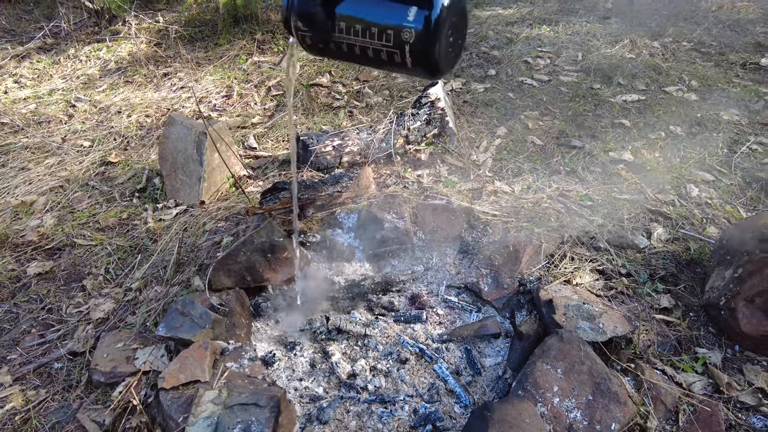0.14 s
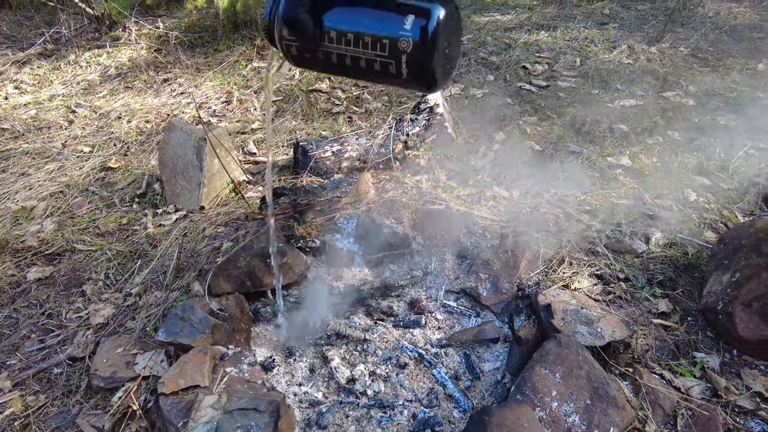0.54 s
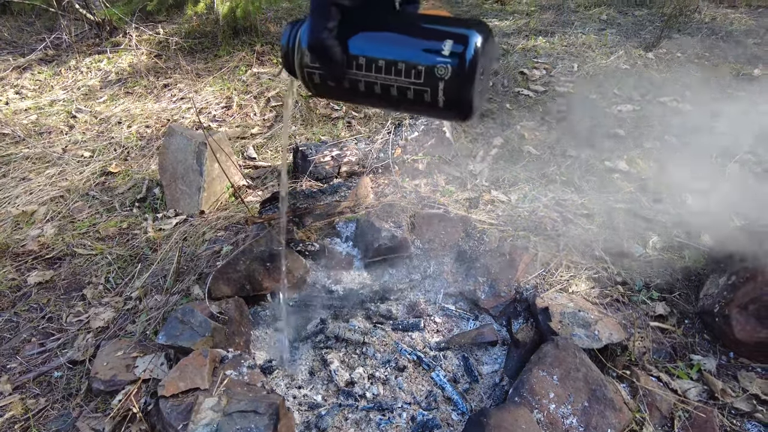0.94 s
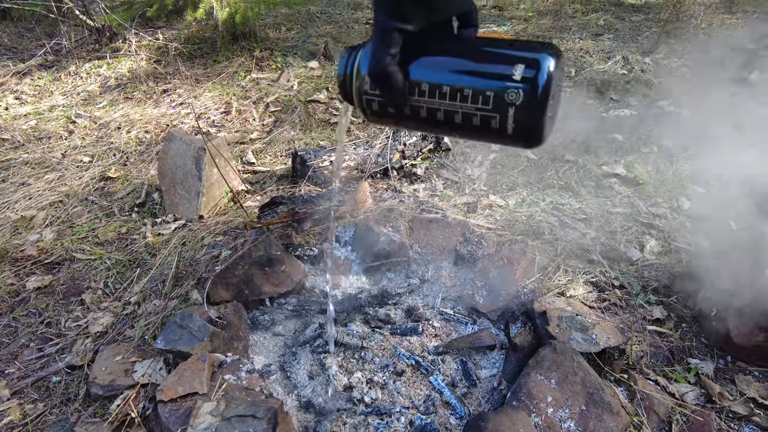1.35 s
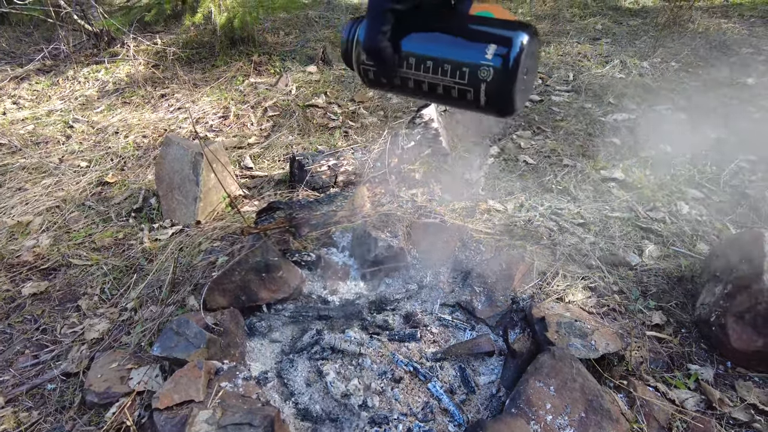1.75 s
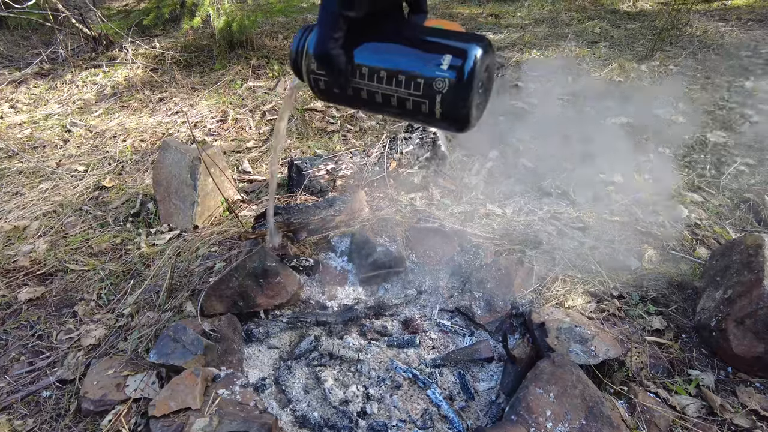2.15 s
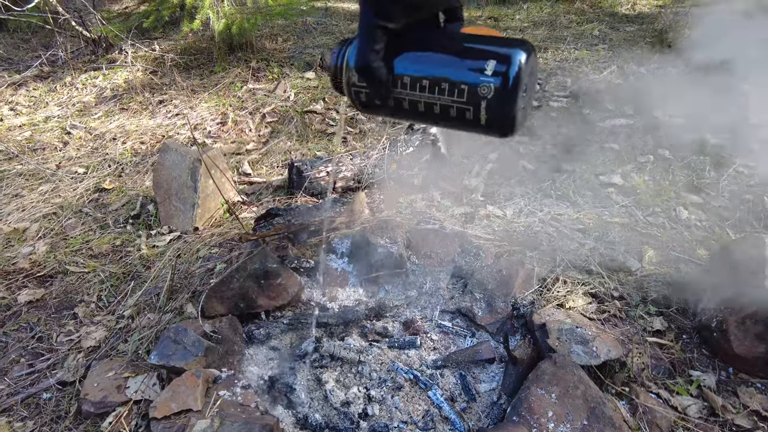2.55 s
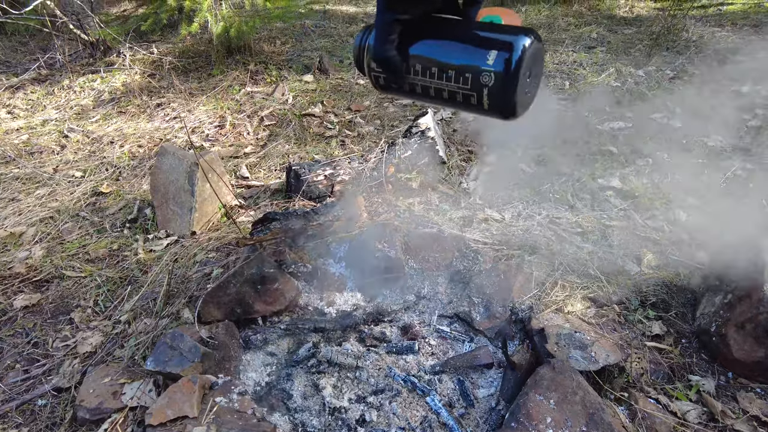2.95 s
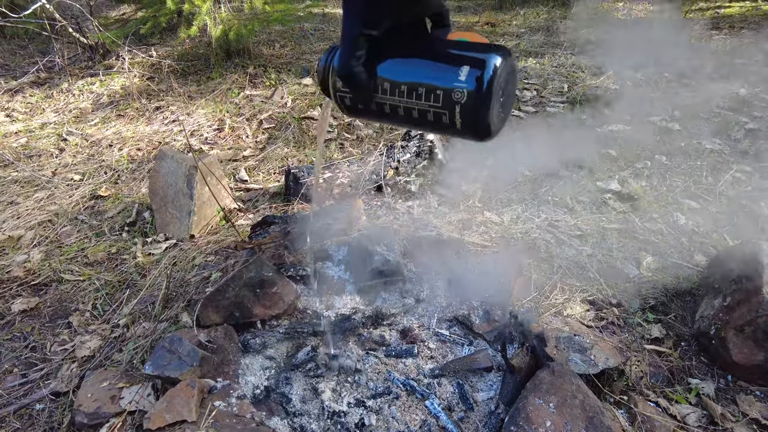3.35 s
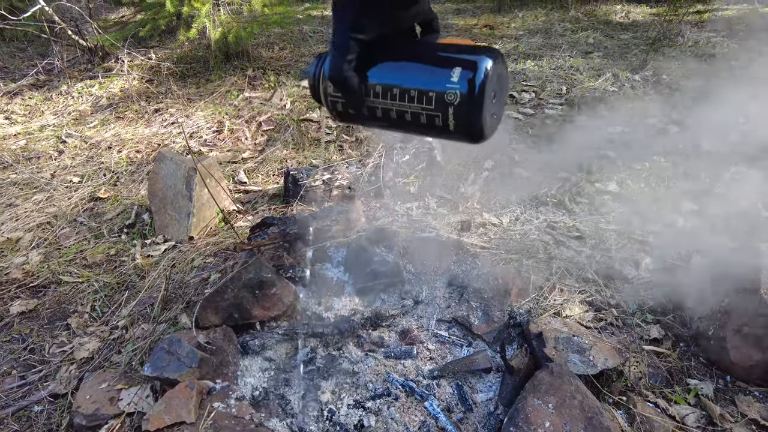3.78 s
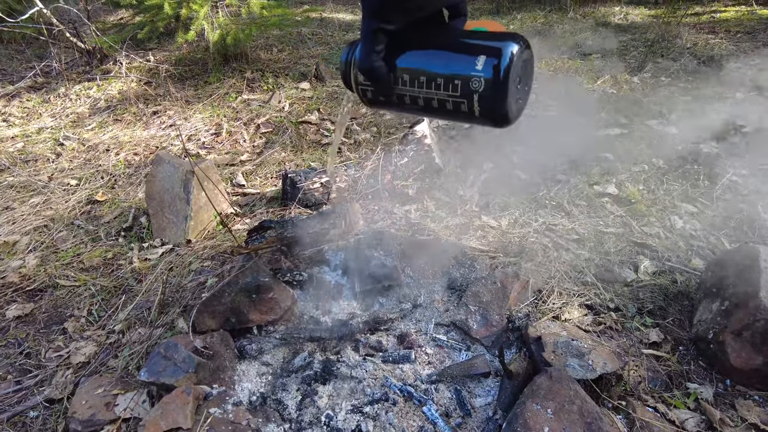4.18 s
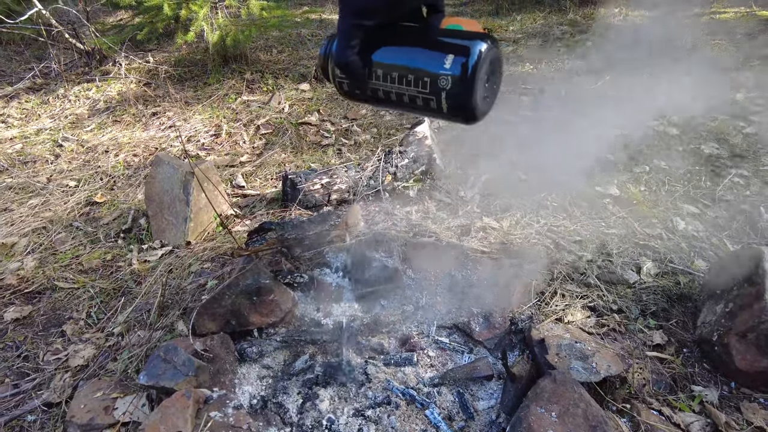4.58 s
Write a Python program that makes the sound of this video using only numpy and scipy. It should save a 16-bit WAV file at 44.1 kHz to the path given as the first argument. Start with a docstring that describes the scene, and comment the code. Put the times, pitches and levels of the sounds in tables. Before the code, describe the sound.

Water is already pouring onto a smouldering campfire at 0 s: a dense, low, muffled patter into soft ash, with wet spray and tiny bubbling rings. The coals answer with fine boiling fizz and bright sputtering steam, slightly left. Small ember cracks come around 0.2 s, with sharper snaps at 0.5 to 0.65 s and another at 1.0 s. From 0.8 s the pour grows patchier, with plops at 0.8, 1.4 and 1.7 s. It thins to a simmer at about 1.9 to 2.3 s, then a splash and quick tss arrive at 2.37 s, and a cluster of cracks near 2.6 s. Heavy slugs land at 2.8 s. After a lull from 3.0 to 3.4 s, a strong gush runs 3.4 to 3.8 s, heaviest around 3.6 s. Spurts follow near 4.0 s, then weak dribbling, and a last splash with a tiny crack at 4.47 s. Close, dry, open-air, with faint bass rumble.

```python
"""At an outdoor campfire, water is poured from a bottle onto the embers, in uneven swells.
Drops thud into soft ash (short low sines) and splatter (noise bursts and tiny ringing bubbles).
The wetted coals boil, hiss with steam and now and then crack: clouds of short sines and shaped noise.
A small stereo microphone stands close by, over a faint outdoor rumble of low-pitched noise."""
import sys
import numpy as np
from scipy import signal
from scipy.fft import rfft, irfft, next_fast_len
from scipy.io import wavfile
from scipy.ndimage import uniform_filter1d

SR = 44100
rng = np.random.default_rng(int(sys.argv[2]) if len(sys.argv) > 2 else 0)


def generate_wav(signal):
    """Clip the signal to [-1, 1] and save it as 16-bit WAV at the path in sys.argv[1]."""
    frames = np.transpose(np.atleast_2d(signal))
    scaled = np.clip(frames, -1, 1) * 32767
    pcm = np.round(scaled).astype(np.int16)
    wavfile.write(sys.argv[1], SR, pcm)


N = 208152  # length in samples

# gushes and trickles from the bottle, levels before each sound's own trim: start t/s, hold/s, release/s,
# thud level/dB, splatter level/dB, sizzle level/dB of the coals they hit
GUSH_TABLE = [(-0.1, 0.3, 0.086, -41.5, -49, -54), (0.242, 0.24, 0.035, -42.5, -50.5, -58),
              (0.45, 0.25, 0.14, -49, -52.5, -55), (0.77, 0.096, 0.18, -44, -53.5, -58.5),
              (0.922, 0.22, 0.11, -52, -56, -54.5), (1.187, 0.066, 0.15, -49.5, -51.5, -55.5),
              (1.37, 0.092, 0.1, -49, -54, -56.5), (1.458, 0.11, 0.066, -53, -56.5, -58),
              (1.588, 0.031, 0.081, -43.5, -51.5, -57), (1.668, .14, 0.098, -43.5, -53.5, -62.5),
              (1.92, 0.37, 0.17, -66.5, -63.5, -69.5), (2.363, 0.019, 0.03, -45, -56, -56.5),
              (2.407, 0.025, 0.057, -48, -50, -55), (2.494, .1, 0.061, -55.5, -71.5, -59),
              (2.635, 0.098, 0.041, -43.5, -53, -59), (2.746, 0.11, 0.06, -43.5, -53.5, -61.5),
              (2.967, 0.057, .018, -59.5, -61.5, -72), (3.05, .17, .03, -85, -68, -75),
              (3.405, 0.031, 0.011, -41.5, -58.5, -57.5), (3.482, 0.29, 0.029, -39, -54, -55.5),
              (3.783, 0.029, .04, -60, -52, -57), (3.993, 0.043, 0.077, -45, -53.5, -59),
              (4.076, 0.089, 0.074, -44.5, -60.5, -62), (4.185, 0.39, .03, -56, -64.5, -62.5),
              (4.454, 0.059, 0.03, -39.5, -53, -56.5), (4.53, 0.14, .12, -50, -59, -57.5)]
# colour of water splattering: f/Hz, relative level/dB
SPLATTER_SPECTRUM = [(150, -18), (400, -0.5), (700, 0.5), (1200, -1), (1500, -2.5), (2300, -4.5),
                     (3100, -1), (4000, -6.5), (6000, -9), (12000, -26)]
# colour of hissing steam: f/Hz, relative level/dB
STEAM_SPECTRUM = [(600, -11), (1500, -3), (3000, 0), (6000, -5.5), (7500, -2.5), (9500, -0.5),
                  (11200, -2.5), (12600, -7.5), (15800, -6)]


def amp(db):
    """Decibels to gain."""
    return 10 ** (np.asarray(db) / 20)


def unit(x):
    """A stereo pair scaled so that its centre (the mean of left and right) has rms 1."""
    return x / np.sqrt(np.mean(x.mean(0) ** 2) + 1e-20)


def along(points, hz):
    """(Hz, value) points joined by straight lines on a log frequency axis."""
    f, v = np.transpose(points)
    return np.interp(np.log(hz + 1), np.log(f + 1), v)


def filtered(x, response):
    """x with each frequency multiplied by response(Hz)."""
    length = next_fast_len(N + 8192)  # silence at the end gives the filter room to ring
    hz = np.fft.rfftfreq(length, 1 / SR)
    return irfft(rfft(x, length) * response(hz), length)[..., :N]


def coloured(x, spectrum):
    """A stereo pair shaped by a spectrum table, at rms 1."""
    return unit(filtered(x, lambda hz: amp(along(spectrum, hz))))


def white():
    """Unrelated white noise in each channel."""
    return rng.standard_normal((2, N))


def grains(start, hz, cycles, size, pan, order):
    """Sines that swell and die within a few cycles, each placed left or right; order = samples per grain."""
    k = np.arange(order)
    turns = hz[:, None] * k / SR
    age = 2 * turns / cycles  # 1 at the peak of the swell
    wave = size[:, None] * np.sin(2 * np.pi * turns) * age * np.exp(1 - age)
    at = ((start * SR).astype(int)[:, None] + k).ravel()
    channels = []
    for side in (-1, 1):
        weights = (wave * (1 + side * pan[:, None])).ravel()
        channels.append(np.bincount(at, weights, N)[:N])
    return np.array(channels)


def shower(rate, hz, octaves, scatter_db, spread):
    """Random small events, rate a second: their start times, pitches, sizes and directions."""
    count = int(rate * N / SR)
    jitter, pitch, size, pan = rng.standard_normal((count, 4)).T
    start = ((np.arange(count) + jitter) / rate) % (N / SR)
    hz = np.clip(hz * 2 ** (octaves * pitch), 30, SR / 2)
    size = amp(scatter_db * np.clip(size, -2.5, 2.5))
    return start, hz, size, spread * pan


def bursts(start, size, decay):
    """The envelope of sprays that start at once and die away; decay in seconds."""
    energy = np.bincount((start * SR).astype(int), size ** 2, N)[:N]
    return np.sqrt(signal.lfilter([1], [1, -np.exp(-2 / (decay * SR))], energy))


def patchy(x, depth_db, size):
    """Neighbouring pitches flare and fade together for a few hundredths of a second; size = bins per patch."""
    z = signal.stft(x, nperseg=256)[2]
    field = rng.standard_normal(z.shape[1:])
    field = uniform_filter1d(field, size, axis=0)  # across pitch
    field = uniform_filter1d(field, size=12, axis=1)  # across time
    flickering = z * amp(depth_db * field / field.std())
    return unit(signal.istft(flickering, nperseg=256)[1][:, :N])


def together(*levels_db):
    """The level in dB of unrelated sounds heard at once: their powers add."""
    return 10 * np.log10(sum(amp(db) ** 2 for db in levels_db))


def gushing(levels_db, attack, release, tail_db, tail_s):
    """Summed level in dB of all gushes: each rises, holds, falls away and leaves a faint long tail."""
    start, hold = np.transpose(GUSH_TABLE)[:2, :, None]
    t = np.arange(0, N, 32) / SR  # every 32nd sample is enough for slow levels
    after = np.maximum(t - start - hold, 0)
    rise = 1 - np.exp(-np.maximum(t - start, 0) / attack)
    drop = np.exp(-after / np.reshape(release, (-1, 1)))
    tail = amp(tail_db) * np.exp(-after / tail_s)
    level = np.linalg.norm(amp(levels_db)[:, None] * rise * np.maximum(drop, tail), axis=0)
    return 20 * np.log10(np.interp(np.arange(N) / SR, t, level) + 1e-9)


def pour():
    """Levels in dB, before trims, of thud, splatter, boiling and steam: the gushes drive all four."""
    # water finds a hot pocket and a jet of steam escapes:
    # middle t/s, half length/s (where it is 4 dB down), level/dB before the steam trim
    jet_table = [(0.036, .06, -69), (0.216, .04, -58), (0.485, .04, -61), (0.695, 0.11, -64.5),
                 (0.816, 0.1, -60.5), (1.093, 0.03, -60), (1.61, 0.022, -58.5), (1.78, 0.081, -67),
                 (2.47, 0.046, -61.5), (2.74, .04, -59), (3.687, 0.036, -60), (3.92, 0.16, -61.5),
                 (4.58, 0.12, -63.5)]
    dribble = dict(tail_db=-7.5, tail_s=0.18)  # stray drops after a gush
    simmer = dict(tail_db=-10.5, tail_s=0.7)  # soaked coals go on simmering
    bed_boil_db, bed_steam_db = -72.5, -67  # the damp fire bed between gushes
    steam_over_boil_db = -6  # the hiss of a gush, relative to its boiling

    _, _, release, thud, splatter, sizzle = np.transpose(GUSH_TABLE)
    thud_db = gushing(thud, 0.011, release, **dribble)
    splatter_db = gushing(splatter, 0.011, release, **dribble)
    # the freshly wetted spot dries, so boiling and steam have fades of their own
    boil_db = gushing(sizzle, attack=0.0088, release=0.15, **simmer)
    hiss_db = gushing(sizzle + steam_over_boil_db, attack=0.021, release=0.21, **simmer)
    t = np.arange(N) / SR
    jets = [db - 4 * ((t - middle) / half) ** 2 for middle, half, db in jet_table]
    return thud_db, splatter_db, together(boil_db, bed_boil_db), together(hiss_db, bed_steam_db, *jets)


def stream(thud_db, splatter_db):
    """Drops dent the ash with dull thuds, throw short sprays and trap tiny bubbles that ring."""
    # colour of thuds in soft ash: f/Hz, relative level/dB
    ash_spectrum = [(20, -45), (45, -4.5), (90, -8), (155, -1.5), (230, -4), (400, -7), (520, -11),
                    (720, -10.5), (1000, -45), (1500, -35), (4000, -70)]
    start, hz, size, pan = shower(rate=400, hz=211.8, octaves=0.74, scatter_db=1.0, spread=1.0)
    push_or_pull = rng.choice([-1, 1], len(size))
    thuds = coloured(grains(start, hz, 0.75, size * push_or_pull, pan, order=1400), ash_spectrum)
    spray = coloured(white() * bursts(start, size, decay=0.0065), SPLATTER_SPECTRUM)
    start, hz, size, pan = shower(rate=800, hz=2010, octaves=0.601, scatter_db=4.0, spread=0.85)
    bubbles = coloured(grains(start, hz, 9.0, size, pan, order=700), SPLATTER_SPECTRUM)
    splatter = patchy(spray + amp(-5.5) * bubbles, depth_db=1.17, size=5)
    return amp(thud_db + 0.5) * thuds + amp(splatter_db - 2.5) * splatter


def slugs():
    """A thick slug of water lands with one low push and a spray."""
    # big slugs of water landing: t/s, level/dB before the trims of push and spray
    slug_table = [(0.804, -23.5), (1.394, -26), (1.689, -31), (1.785, -35), (2.369, -26), (2.783, -21),
                  (2.815, -22), (2.839, -30), (3.038, -31), (3.419, -22), (3.5, -33), (3.625, -18),
                  (3.789, -19), (4.484, -24), (4.498, -28)]
    start, db = np.transpose(slug_table)
    pitch = np.full(len(db), 138)  # Hz
    pushes = grains(start, pitch, 0.48, amp(db - 8), np.zeros(len(db)), order=2000)
    # a small dent radiates no deep bass
    pushes = signal.lfilter(*signal.butter(2, 60, "highpass", fs=SR), pushes)
    spray = coloured(white(), SPLATTER_SPECTRUM) * bursts(start, amp(db - 31.5), decay=0.0075)
    return pushes + spray


def boiling(boil_db):
    """Water boils on the hot charcoal: vapour bubbles pop and ring briefly over a coarse fizz."""
    # colour of boiling: f/Hz, relative level/dB
    boil_spectrum = [(800, -20), (2000, -2.5), (3000, -3), (4300, 0), (5300, -1.5), (6300, -5),
                     (7500, -9.5), (12000, -38)]
    start, hz, size, pan = shower(rate=1300, hz=4340, octaves=0.432, scatter_db=1.0, spread=1.0)
    pops = coloured(grains(start, hz, 6.9, size, pan, order=400), boil_spectrum)
    fizz = coloured(white() * bursts(start, size, decay=0.0047), boil_spectrum)
    mixed = patchy(pops + amp(4.0) * fizz, depth_db=1.5, size=7)
    return amp(boil_db - 3.5) * mixed * amp([[0.5], [-0.5]])  # slightly stronger on the left


def steam(steam_db):
    """Water flashes off the coals: a sputtering hiss, thick with tiny ticks."""
    start, hz, size, pan = shower(rate=310, hz=7000, octaves=0.5, scatter_db=1.5, spread=0.8)
    hiss = coloured(white() * bursts(start, size, decay=0.022), STEAM_SPECTRUM)
    start, hz, size, pan = shower(rate=2400, hz=7980, octaves=0.35, scatter_db=2.5, spread=0.4)
    ticks = coloured(grains(start, hz, 2.3, size, pan, order=200), STEAM_SPECTRUM)
    mixed = patchy(hiss + amp(-9) * ticks, depth_db=1.17, size=10)
    lean_db = 1.27  # the wet coals lie a little to the left
    return amp(steam_db + 2.5) * mixed * amp([[lean_db], [-lean_db]])


def flashes():
    """Water striking hot coal turns to steam at once, with a sharp 'tss'."""
    # water striking hot coal: t/s, level/dB, decay/s
    flash_table = [(2.3672, -50.5, 0.014), (3.41, -62, 0.021), (4.4696, -56, 0.0037)]
    puffs = sum(bursts(np.array([s]), amp([db]), decay) for s, db, decay in flash_table)
    hiss = coloured(white(), STEAM_SPECTRUM)
    splash = coloured(white(), SPLATTER_SPECTRUM)
    return puffs * unit(hiss + amp(0.5) * splash)


def cracks():
    """A quenched ember spits for a few milliseconds in its own band of pitch."""
    # the loudest embers cracking: t/s, peak level/dB before panning, middle f/Hz, width/octaves
    crack_table = [(0.178, -41.5, 7800, 0.21), (0.2029, -41, 7600, 0.36), (0.2243, -39.5, 5000, 0.44),
                   (0.5335, -35, 4070, 1.3), (0.626, -36.5, 2080, 0.62), (0.655, -36.5, 6600, 0.68),
                   (0.995, -39.5, 4730, 0.38), (2.552, -41, 9300, 1.7), (2.6062, -38.5, 3030, 0.36),
                   (2.6068, -37, 4700, 0.38), (2.621, -42, 7000, 1.7), (3.3117, -45, 8200, 0.96),
                   (3.9482, -41, 9000, 0.6), (4.0794, -45, 10600, 0.17), (4.469, -43, 3130, 0.6)]
    out = np.zeros((2, N + SR))  # room for a crack at the very end
    t = np.arange(SR // 40) / SR
    for s, db, hz, octaves in crack_table:
        edges = np.clip(hz * 2 ** (octaves * np.array([-0.5, 0.5])), 100, SR / 2.1)
        burst = rng.standard_normal(len(t)) * np.exp(-t / 0.0016)
        spit = signal.lfilter(*signal.butter(2, edges, "bandpass", fs=SR), burst)
        spit = amp(db) * spit / np.abs(spit).max()
        pan = np.clip(rng.normal(0.1, 0.63), -1, 1)
        first = round(s * SR)
        out[:, first:first + len(t)] += spit * [[1 + pan], [1 - pan]]
    return out[:, :N]


def spits(boil_db):
    """Smaller embers spit at random as short sines, louder the harder the coals boil."""
    start, hz, size, pan = shower(rate=25, hz=4800, octaves=0.416, scatter_db=3.5, spread=0.35)
    return amp(boil_db + 6.5) * grains(start, hz, 2.1, size, pan, order=500)


def outdoor_air():
    """The faint outdoor rumble: steady noise, strongest in the bass."""
    # colour of the rumble: f/Hz, relative level/dB
    rumble_spectrum = [(20, -49), (45, -0.5), (90, 6.5), (140, -7), (230, -13), (450, -13), (600, -26),
                       (1000, -21), (1500, -33), (8000, -47)]
    return amp(-58.0) * coloured(white(), rumble_spectrum)


def scene():
    """The pour, the fire's answer and the outdoor air."""
    thud_db, splatter_db, boil_db, steam_db = pour()
    water = stream(thud_db, splatter_db) + slugs()
    embers = boiling(boil_db) + steam(steam_db) + flashes() + cracks() + spits(boil_db)
    return water + embers + outdoor_air()


def record(dry):
    """The housing colours the sound, the left port leads, left-right difference is weighted by pitch, top cut."""
    # resonances and one notch of the microphone housing: centre f/Hz, width/Hz, level/dB
    housing_table = [(980, 106, -5.5), (1239, 70, 6), (1390, 107, 6.5), (1803, 227, 2.5), (3014, 274, 7),
                     (4210, 140, 3.5), (4956, 77, 5), (6000, 180, 3.5), (7910, 150, 4), (10880, 150, 3)]
    # gain of the left-right difference by pitch: f/Hz, level/dB
    difference_table = [(60, -26), (78, -20), (100, -24), (130, -20), (170, -19), (220, -12), (290, -13),
                        (380, -10), (490, -6.5), (640, 3.5), (830, 11), (1080, 8.5), (1410, -19),
                        (1830, -10), (2380, -7.5), (3100, -6.5), (4030, -2.5), (5240, -5), (6820, -2.5),
                        (8870, -3), (11500, 3.5), (15000, -4)]
    # share of that difference due to the sound reaching the left port first: f/Hz, share (0 to 1)
    lead_table = [(60, 0.44), (250, 0.56), (900, 0.76), (1400, 0.46), (3000, 0.4), (8000, .25),
                  (12000, 0.061)]
    top_hz = 15830

    def housing(hz):
        return amp(sum(db * np.exp(-((hz - centre) / width) ** 2) for centre, width, db in housing_table))

    def lead(hz):
        return np.clip(along(lead_table, hz), 0, 1)

    left, right = filtered(dry, housing)
    mid = (left + right) / 2
    # the factor 1j shifts by a quarter cycle, which puts the left channel ahead
    early = filtered(mid, lambda hz: 1j * np.sqrt(lead(hz)))
    spread = filtered((left - right) / 2, lambda hz: np.sqrt(1 - lead(hz)))
    side = filtered(early + spread, lambda hz: amp(along(difference_table, hz)))
    return filtered(np.array([mid + side, mid - side]), lambda hz: hz < top_hz)


dry = scene()
out = record(dry)
generate_wav(out)
```